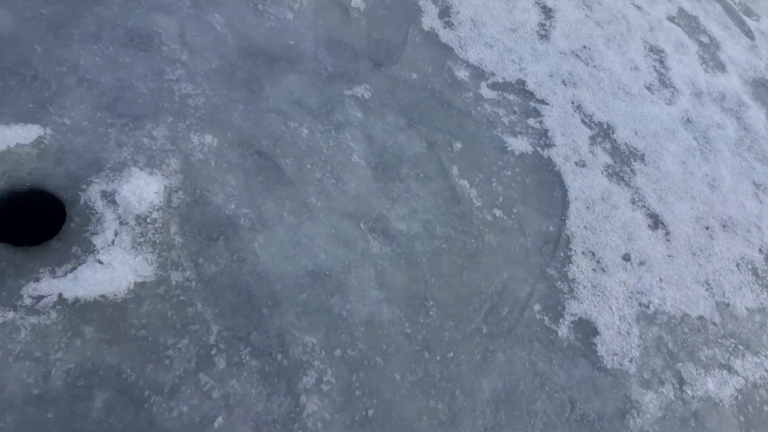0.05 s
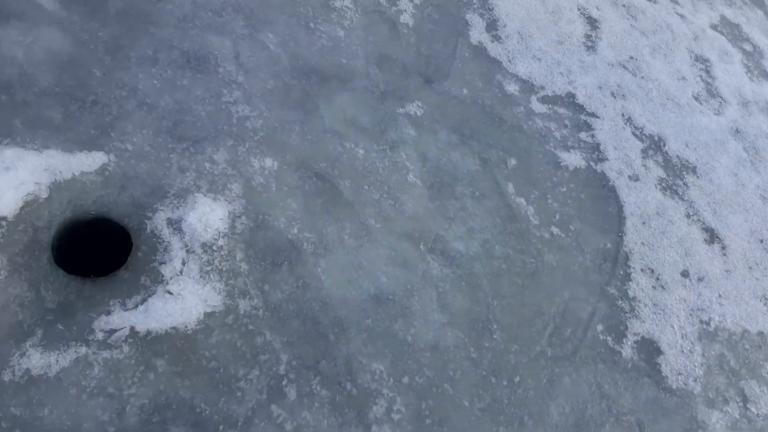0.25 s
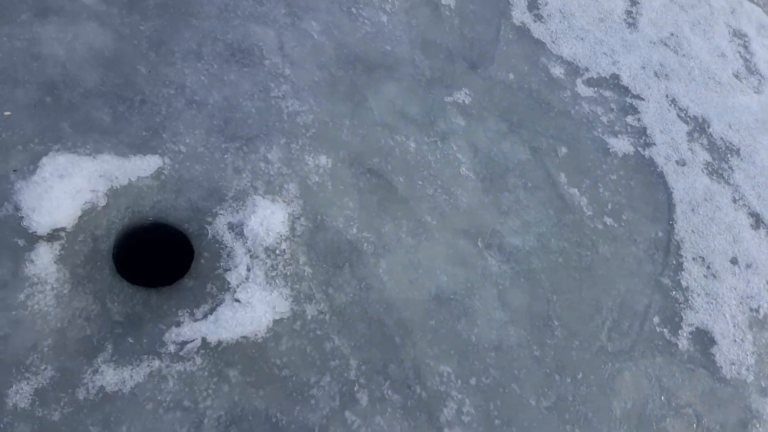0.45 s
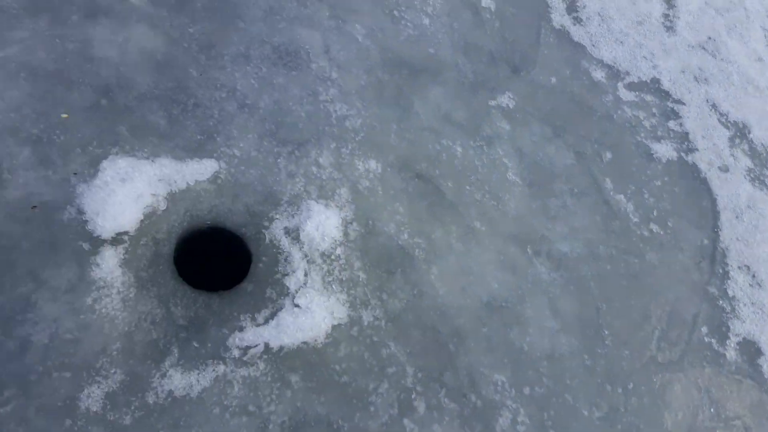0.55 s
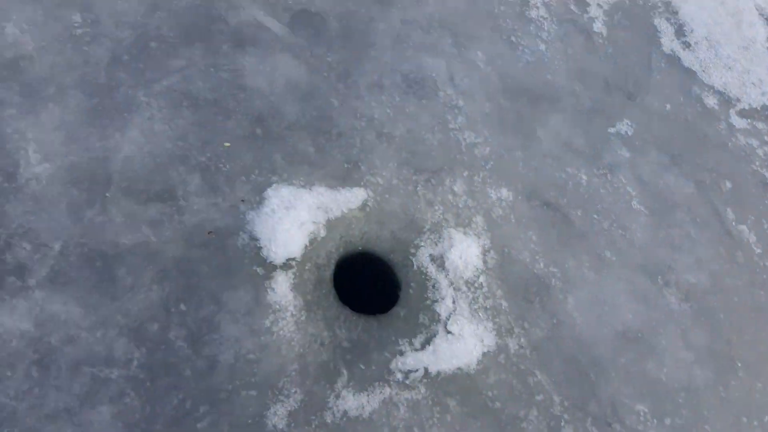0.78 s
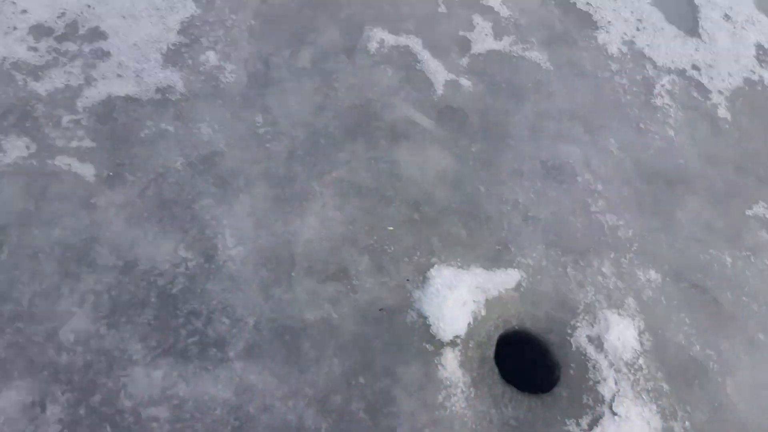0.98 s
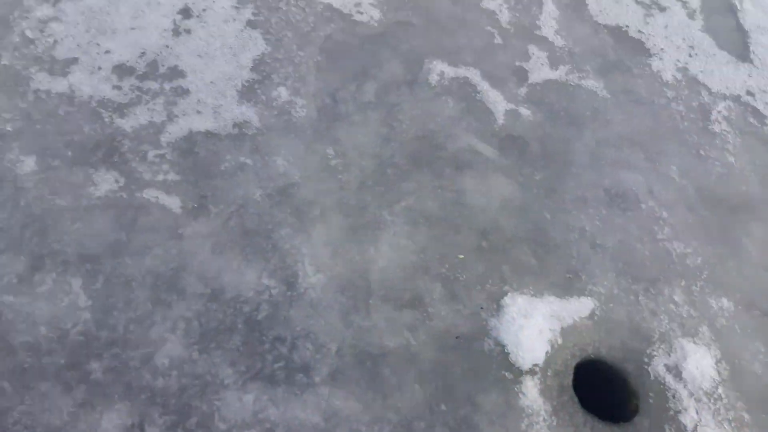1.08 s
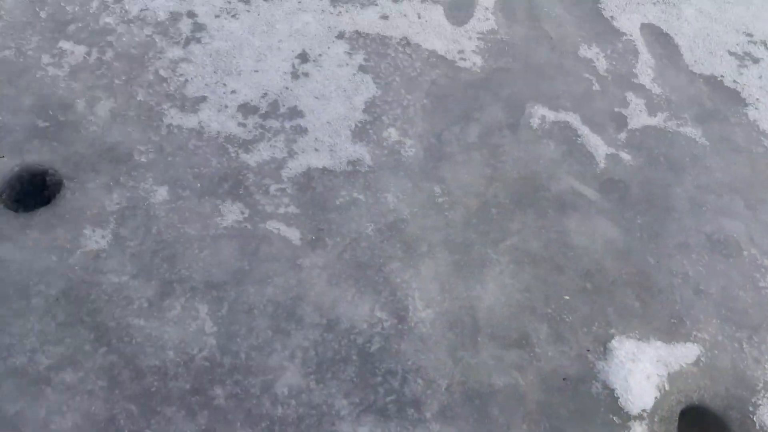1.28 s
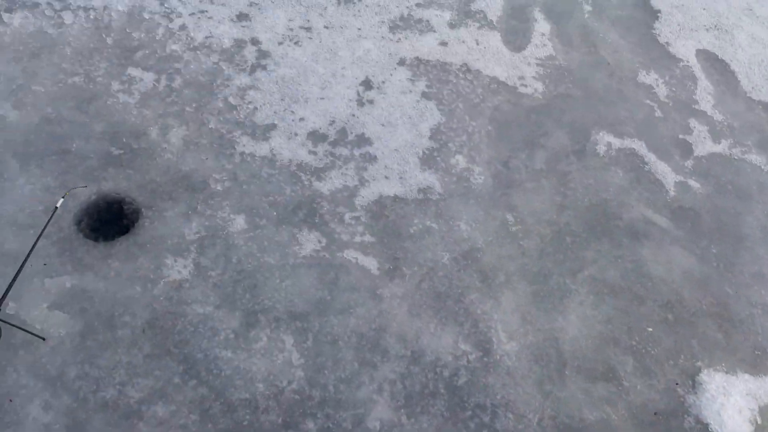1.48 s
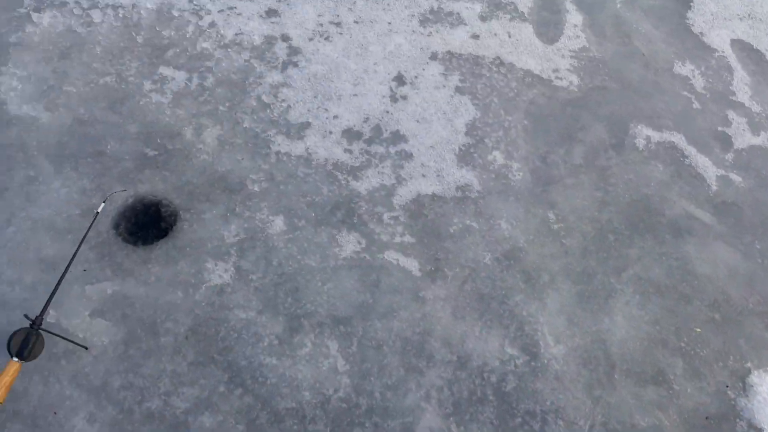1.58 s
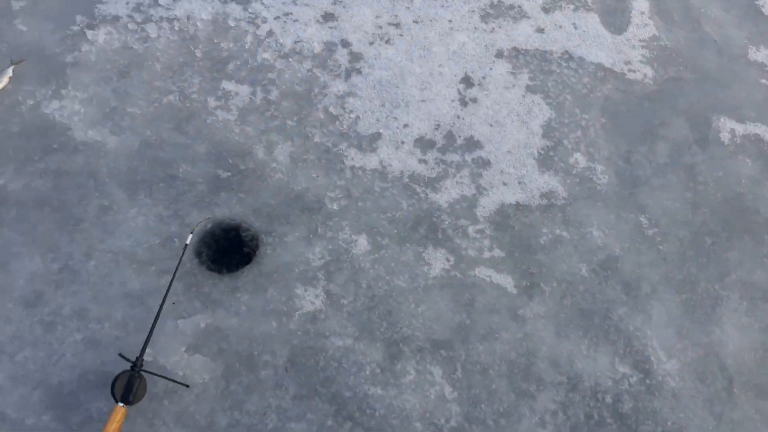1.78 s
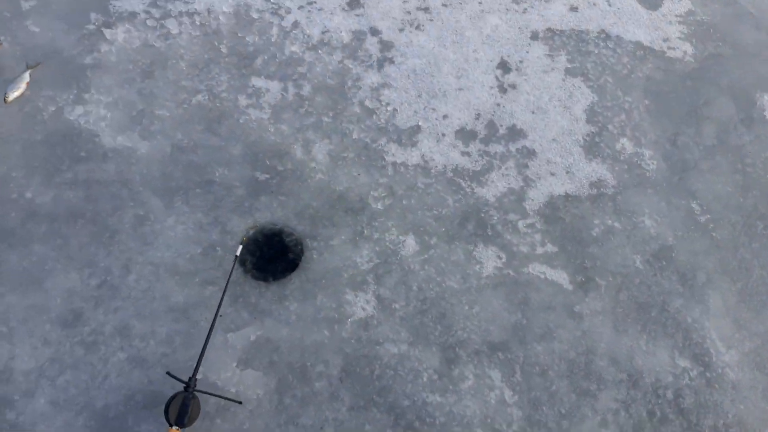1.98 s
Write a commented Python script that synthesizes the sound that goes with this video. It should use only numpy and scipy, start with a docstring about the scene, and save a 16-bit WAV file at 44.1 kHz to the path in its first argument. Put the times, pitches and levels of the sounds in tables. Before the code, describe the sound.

Three footsteps crunch on crusty ice while wind buffets the microphone.

```python
"""On a frozen lake: three steps on crusty ice, heard through two small microphone openings (ports).
Each boot crushes the crust in a burst of tiny fractures, then rolls on with smaller crunches and snaps.
A heel thuds, the sole creaks, reflections off the ice make sweeping tones and clothing swishes once.
Gusts of wind buffet each port separately, over a faint hiss. Levels in the tables are relative."""
import sys
import numpy as np
from scipy import signal
from scipy.fft import rfft, irfft
from scipy.io import wavfile
from scipy.ndimage import uniform_filter1d, map_coordinates

SR = 44100
rng = np.random.default_rng(int(sys.argv[2]) if len(sys.argv) > 2 else 0)


def generate_wav(signal):
    """Clip the signal to [-1, 1] and save it as 16-bit WAV at the path in sys.argv[1]."""
    frames = np.transpose(np.atleast_2d(signal))
    scaled = np.clip(frames, -1, 1) * 32767
    pcm = np.round(scaled).astype(np.int16)
    wavfile.write(sys.argv[1], SR, pcm)


N = 90404

# Tone colour of the wind's flutter: f/Hz, level/dB
FLUTTER_COLOUR = [(60, -18), (150, -11), (260, 1.5), (360, -3.5), (500, -11.5), (700, -29), (1200, -52.5),
                  (3000, -70)]


def boots():
    """The sounds of the steps reach the right port a little later and scatter off ice and walker."""
    # Delay at the right port as the boots move about: t/s, delay/ms
    port_delay = [(.2, 0.33), (.45, 0.29), (.88, 0.34), (1.07, 0.39), (1.55, 0.2), (1.68, 0.17)]
    # How much louder the right port is than the left: f/Hz, level/dB
    right_colour = [(100, 3), (700, -2.5), (1500, 3), (2600, 0.5), (4100, -3), (6300, -0.5), (8600, -4),
                    (11000, -4), (16000, 1.5)]
    phase_lead_rad, scatter_db, scatter_s = 0.87, -9, 0.028
    left, right = crunches_and_swish() + snaps() + gliding_rings()
    hz, now = np.fft.rfftfreq(N, 1 / SR), np.arange(N) / SR
    delay_s = over_time(port_delay) / 1000
    right = map_coordinates(right, [(now - delay_s) * SR], order=5)
    right = irfft(rfft(right) * amp(over_frequency(right_colour, hz)) * np.exp(1j * phase_lead_rad), N)
    direct = np.array([left, right])
    t = np.arange(SR // 5) / SR
    tail = rng.standard_normal((2, len(t))) * amp(-60 * t / scatter_s)
    scatter = signal.fftconvolve(direct, tail / np.linalg.norm(tail[0]), axes=1)[:, :N]
    return direct + amp(scatter_db) * scatter


def crunches_and_swish():
    """Crunches of breaking crust, plus one faint high swish of clothing between steps (at 1.346 s)."""
    # Crunches and the swish: t/s, length/s, level/dB, fade/dB, treble/dB, sparkle/dB, f of the ring/Hz
    bursts = [(0.194, 0.065, -36, 1, 4, 0.5, 2270), (0.272, 0.027, -36.5, 3.5, -3.5, 1, 2420),
              (0.299, 0.04, -35.5, -3.5, 0, 2, 2120), (0.341, 0.12, -46.5, -2.5, 9.5, -1.5, 900),
              (0.459, 0.057, -59, 2, 6, 1, 1320), (0.509, 0.0077, -46.5, 3, 5.5, 5, 2130),
              (0.663, 0.017, -48.5, -8.5, -4, 1, 1520), (.863, 0.033, -37, -2.5, 5.5, 7.5, 2270),
              (0.895, 0.033, -38, -4, 2, 3, 750), (0.929, 0.053, -48, -6.5, 2.5, 9.5, 2150),
              (0.974, 0.011, -36, 0.5, -3, 3, 1730), (0.991, 0.039, -46.5, 4.5, -2, -0.5, 1460),
              (1.029, 0.011, -34, -2.5, -14, -4, 1500), (1.043, 0.047, -44, -5.5, 7, -3.5, 1590),
              (1.103, 0.17, -54, -5.5, 9, -7, 500), (1.346, 0.134, -81, 6, 12, 13, 12000),
              (1.5415, 0.016, -38.5, -7, 3, 5.5, 1500), (1.56, 0.022, -35, -3.5, 4.5, 2.5, 1680),
              (1.59, 0.019, -37, -2, 2, 2, 735), (1.618, 0.064, -50.5, -4.5, 1, 5, 800),
              (1.661, 0.015, -45.5, 0.5, -0.5, 1, 660), (1.682, 0.091, -51.5, 2.5, 4, 3.5, 1240),
              (1.791, 0.13, -64.5, -2, 8.5, 8.5, 1290)]
    # Tone colour of the crust: f/Hz, level/dB
    crust_colour = [(60, -4), (250, -2.5), (420, 2), (700, 1), (1100, -0.5), (1700, -0.5), (2400, -4.5),
                    (3200, -9), (4000, -15), (5400, -11), (7200, -14), (8600, -24.5), (10000, -22.5),
                    (12000, -17.5), (16000, -23)]
    # The ports hear much the same bass but different treble: f/Hz, likeness (1 = the same)
    likeness = [(100, .7), (900, .9), (1500, .85), (2200, .6), (5000, .4), (8500, .08), (15000, .05)]
    out = np.zeros((2, N))
    for start, *settings in bursts:
        add(out, start, grainy_burst(*settings))
    left, other = rfft([colour(side, crust_colour) for side in out * amp(-1)])
    same = over_frequency(likeness, np.fft.rfftfreq(N, 1 / SR))
    right = same * left + np.sqrt(1 - same ** 2) * other
    return irfft([left, right], N)


def grainy_burst(length, level_db, fade_db, treble_db, sparkle_db, ring_hz):
    """Clumps of clicks with a ring; in a crunch, tiny fractures ring the hollow under the sole."""
    clicks_per_s, size_spread_db, clump_s = 5000, 2, 0.0044
    attack_s, release_s = 0.0018, 0.015
    wander_octaves, wander_s = 0.087, 0.0265
    treble_hz, sparkle_hz = 3260, 8900
    t = np.arange(0, length + 6 * release_s, 1 / SR)
    chance, size, *draws = rng.random((7, SR // 2))
    noise = np.array(draws) - 0.5
    sizes = (chance < clicks_per_s / SR) * amp(size_spread_db * np.minimum(-np.log(1 - size), 4))
    clicks = unit(sizes * np.sign(noise[:2]))  # each click pushes or pulls at random on each side
    powder = 0.34 * unit(noise[2:4])
    clumps_db = smooth(noise[4], clump_s)
    grains = (clicks + powder) * amp(clumps_db)
    attack = np.minimum(t / attack_s, 1)
    fade = amp(fade_db * np.minimum(t / length, 1))
    release = np.exp(-np.maximum(t - length, 0) / min(release_s, 0.55 * length))  # faster if short
    burst = unit(grains[:, :len(t)]) * attack * fade * release
    wander = smooth(rng.standard_normal(SR // 2), wander_s)[:len(t)]  # a rolling sole resizes the hollow
    ring = 2.12 * resonate(burst, ring_hz * 2 ** (wander_octaves * wander), width_hz=145)
    hz = np.fft.rfftfreq(len(t), 1 / SR) + 1
    brightness_db = treble_db / (1 + (treble_hz / hz) ** 3) + sparkle_db / (1 + (sparkle_hz / hz) ** 6)
    return amp(level_db) * irfft(rfft(burst + ring) * amp(brightness_db), len(t))


def snaps():
    """Each single crack in the ice is a gritty chirp a few milliseconds long."""
    # Cracks: t/s, level/dB, f/Hz, length/s, upward glide/octaves
    cracks = [(0.3, -35, 1160, 0.0068, 0.26), (0.308, -26.5, 1940, 0.0086, 0.12),
              (.3825, -34, 14200, 0.0024, 0.13), (.445, -22, 2260, 0.00433, 0.71),
              (0.868, -38, 730, 0.0049, 0.21), (.885, -40, 940, 0.0042, 0.26),
              (0.98, -39, 14000, .0039, 0.049), (1.035, -34, 2310, 0.0082, .07),
              (1.07, -38, 2050, .0024, 0.37), (1.542, -31.5, 1440, 0.0055, 0.16),
              (1.558, -37, 1280, 0.0025, 0), (1.582, -32, 1300, 0.0097, 0),
              (1.6705, -32.5, 1695, 0.0035, 1), (1.738, -39.5, 1380, 0.0037, .1),
              (1.763, -37, 1357, 0.0074, 0.21), (1.849, -45, 1280, 0.0024, 0)]
    out = np.zeros((2, N))
    for start, level_db, hz, length, glide in cracks:
        progress = np.linspace(0, 1, round(length * SR))
        band = signal.iirpeak(hz, Q=1 + hz / SR * 10, fs=SR)
        grit = unit(signal.lfilter(*band, rng.standard_normal((2, SR // 20))))[:, :len(progress)]
        tone = np.sin(2 * np.pi * np.cumsum(hz * 2 ** (glide * progress)) / SR)
        swell = np.sin(np.pi * np.sqrt(progress))
        add(out, start, amp(level_db) * swell * (tone + 0.21 * grit))
    return out


def gliding_rings():
    """A heel's low thud, creaks of the sole, and sweeping tones from sound reflecting off the ice."""
    # Thud (first row), reflections (2-3 kHz) and creaks (the rest):
    # t/s, length/s, level/dB, first f/Hz, last f/Hz, band width/Hz
    rings = [(0.216, 0.047, -38.5, 294, 420, 207), (0.223, .03, -37, 2184, 2030, 70),
             (0.202, 0.056, -49, 2750, 3040, 260), (0.259, 0.089, -44.5, 2238, 2750, 161),
             (0.267, 0.024, -39.5, 973, 1150, 70), (.29, 0.044, -45, 1200, 1354, 160),
             (0.321, .028, -38, 1095, 990, 60.4), (0.345, 0.041, -53.5, 838, 995, 40),
             (0.401, 0.021, -49, 1250, 1210, 35), (0.425, 0.022, -52, 1007, 980, 35),
             (1.563, 0.07, -47, 1696, 1510, 140)]
    out = np.zeros((2, N))
    for start, length, level_db, first_hz, last_hz, width_hz in rings:
        progress = np.linspace(0, 1, round(length * SR))
        decay = np.exp(-np.pi * width_hz / SR)
        noise = rng.standard_normal((2, SR // 2))
        wobble = signal.lfilter([1], [1, -2 * decay, decay ** 2], noise)[:, -len(progress):]
        angle = 2 * np.pi * np.cumsum(first_hz + (last_hz - first_hz) * progress) / SR
        ring = unit(wobble[0] * np.cos(angle) + wobble[1] * np.sin(angle))
        swell = np.sqrt(abs(np.sin(np.pi * progress)))
        add(out, start, (amp(level_db) * swell * ring)[None])
    return out


def wind():
    """Gusts on the ports make a deep rumble with a flutter above it."""
    # Tone colour of the rumble: f/Hz, level/dB
    rumble_colour = [(10, -51), (28, -17), (40, -9), (54, -7), (75, -3.5), (105, -3), (150, -5.5),
                     (220, -19.5), (400, -47), (900, -77)]
    # Rise and fall of the rumble: t/s, level/dB
    rumble_levels = [(0, -41), (.07, -54.5), (.17, -73), (.23, -40), (.28, -44.5), (.42, -36.5),
                     (.48, -42.5), (.79, -37.5), (.83, -33), (.96, -30), (1.15, -33.5), (1.25, -29.5),
                     (1.33, -47.5), (1.38, -35.5), (1.46, -39), (1.54, -34.5), (1.73, -35), (1.79, -46),
                     (2.04, -47)]
    # Rise and fall of the flutter: t/s, level/dB
    flutter_levels = [(0, -50.5), (.17, -84), (0.221, -39), (.3, -47.5), (.55, -49), (.61, -53.5),
                      (.69, -45), (.73, -57), (0.769, -41), (1.01, -37.5), (1.08, -42.5), (1.19, -38.5),
                      (1.23, -43.5), (1.28, -35.5), (1.32, -50.5), (1.49, -42), (1.751, -43), (1.8, -58.5),
                      (2.05, -53.5)]
    rumble = turbulence(rumble_colour, rumble_levels, gain_db=2.5)
    flutter = turbulence(FLUTTER_COLOUR, flutter_levels, gain_db=3)
    return rumble + flutter


def turbulence(shape, levels, gain_db):
    """Churning air presses on each port in its own random lumps, following the gusts."""
    lump_db, lump_s = 5, 0.015
    noise, jitter = rng.standard_normal((2, 2, N))
    keep_slow = np.exp(-(np.fft.rfftfreq(N, 1 / SR) * lump_s) ** 2)
    lumps = unit(irfft(rfft(jitter) * keep_slow, N))
    pressure = noise * amp(lump_db * np.clip(lumps, -2, 2))
    flow = unit(np.array([colour(side, shape) for side in pressure]))
    return flow * amp(gain_db + over_time(levels))


def buffets():
    """A large swirl of air pushes and pulls at one port, then the other, with a short flutter."""
    # Swirls: t/s, f/Hz, left level/dB, right level/dB, flutter level against the swirl/dB
    swirls = [(0.064, 93, -57, -29, -35), (0.545, 150, -29.5, -26.5, -3.5), (0.581, 118, -23.5, -29, -11),
              (0.633, 119, -24.5, -29.5, -16.5), (0.8151, 106, -13, -14, -18.5),
              (0.847, 102, -17.5, -37, -20), (0.949, 93, -15.5, -28, -19), (.9557, 113, -23, -10.5, -17.5),
              (.998, 240, -17, -26, -16), (1.113, 213, -20.5, -22, -4.5), (1.122, 437, -24.5, -30, -6),
              (1.17, 153, -25, -13.5, -15.5), (1.205, 278, -15.5, -19.5, -7.5),
              (1.222, 112, -24, -20.5, -13), (1.27, 198, -24, -21, -10), (1.377, 101, -24.5, -24.5, -19.5),
              (1.479, 130, -19.5, -20.5, -15), (1.631, 128, -22, -21, -13), (1.909, 101, -26.5, -36, -18.5),
              (1.977, 85, -28, -32, -26.5), (2.022, 83.6, -27.5, -30, -24)]
    swirl_cycles, wake_cycles, port_gap_cycles = 0.75, 1.14, 0.28
    out = np.zeros((2, N))
    wake = unit(np.array([colour(side, FLUTTER_COLOUR) for side in rng.standard_normal((2, N))]))
    for peak_s, hz, left_db, right_db, flutter_db in swirls:
        phase, direction = rng.random(2)
        cycles = (np.arange(N) / SR - peak_s) * hz
        port_shift = np.array([[0], [np.sign(direction - 0.5) * port_gap_cycles]])
        swing = np.sin(2 * np.pi * (cycles + phase + port_shift)) * np.exp(-(cycles / swirl_cycles) ** 2)
        flutter = amp(flutter_db) * wake * np.exp(-(cycles / wake_cycles) ** 2)
        out += amp([[left_db], [right_db]]) * (swing + flutter)
    return out


def hiss():
    """A faint background hiss drifts in level and is coloured differently by each port."""
    # Tone colour at the left port: f/Hz, level/dB
    left_colour = [(50, 14.5), (400, 14), (900, 3.5), (2200, 1), (2950, -6.5), (3400, -4), (4400, -0.5),
                   (5600, -3), (7500, -3), (9200, -7.5), (12500, -5.5), (16000, -6)]
    # Tone colour at the right port: f/Hz, level/dB
    right_colour = [(50, 28.5), (400, 12.5), (900, 9), (2200, 7), (3200, -2.5), (4000, -10), (5200, 3.5),
                    (6500, 1), (8500, -20), (10500, -15), (14000, -9), (16000, -25)]
    # Slow drift: t/s, level/dB
    drift = [(0, 3.5), (.15, 0.5), (.55, 4.5), (.82, 0.5), (1.15, 1.5), (1.42, 3.5), (1.53, 2), (1.85, 5),
             (2.05, -1.5)]
    left, right = rng.standard_normal((2, N))
    return amp(over_time(drift) - 56) * np.array([colour(left, left_colour), colour(right, right_colour)])


def amp(db):
    """Turns decibels into a gain."""
    return 10 ** (np.asarray(db) / 20)


def unit(x):
    """Scales a signal to an average power of 1."""
    return x / np.sqrt(np.mean(x ** 2) + 1e-20)


def smooth(noise, seconds):
    """Averages noise into a slower wobble of power 1."""
    return unit(uniform_filter1d(noise, round(seconds * SR)))


def over_time(points):
    """Joins a table's points with straight lines, one value per sample."""
    return np.interp(np.arange(N) / SR, *np.transpose(points))


def over_frequency(points, hz):
    """Reads a table at the frequencies hz, with octaves evenly spaced."""
    f, value = np.transpose(points)
    return np.interp(np.log(hz + 1), np.log(f + 1), value)


def colour(sound, points):
    """Gives a sound a tone colour; white noise keeps its power."""
    log_gain = np.log(amp(over_frequency(points, abs(np.fft.fftfreq(8192, 1 / SR)))))
    response = np.exp(np.conj(signal.hilbert(log_gain)))  # rings after a click, never before it
    taps = np.fft.ifft(response).real[:4096]
    return signal.fftconvolve(sound, taps / np.linalg.norm(taps))[:len(sound)]


def resonate(sound, hz, width_hz):
    """Picks out a narrow band around the moving pitch hz."""
    turn = np.exp(2j * np.pi * np.cumsum(hz) / SR)
    decay = np.exp(-np.pi * width_hz / SR)
    return 2 * (turn * signal.lfilter([1 - decay], [1, -decay], sound / turn)).real


def add(mix, start_s, sound):
    """Adds a sound to both channels of the mix at start_s."""
    part = mix[:, round(start_s * SR):][:, :sound.shape[1]]
    part += sound[:, :part.shape[1]]


def scene():
    """Wind and footsteps over the hiss."""
    return wind() + buffets() + boots() + hiss()


def record(dry):
    """Cuts off the very highest treble."""
    cutoff_hz = 15850
    low_pass = signal.firwin(511, cutoff_hz, window=("kaiser", 9), fs=SR)
    return signal.oaconvolve(dry, low_pass[None], "same")


dry = scene()
out = record(dry)
generate_wav(out)
```